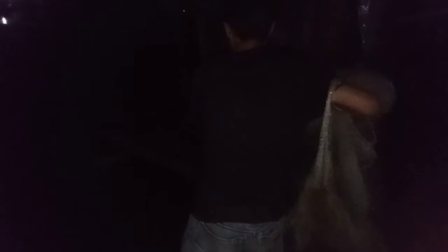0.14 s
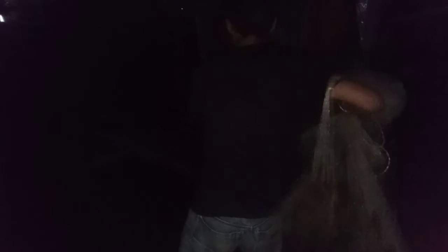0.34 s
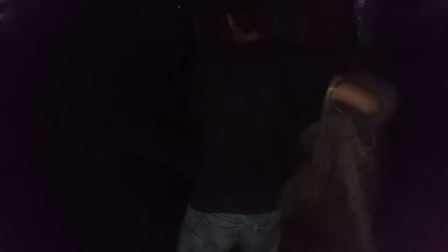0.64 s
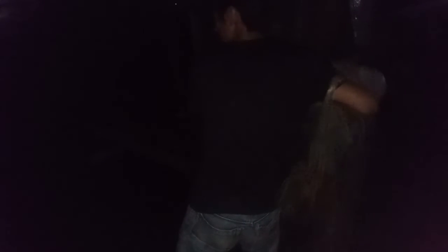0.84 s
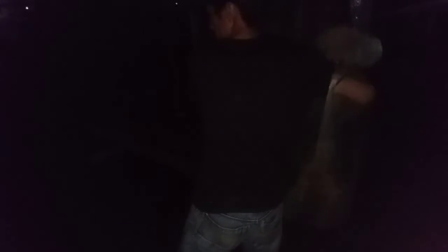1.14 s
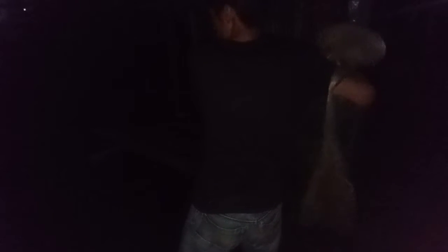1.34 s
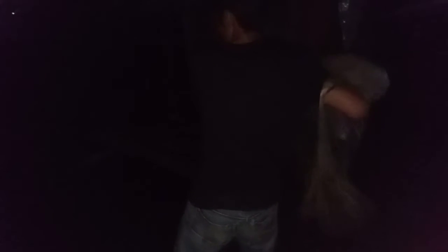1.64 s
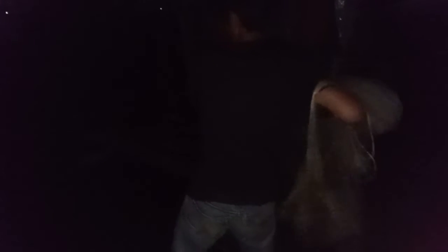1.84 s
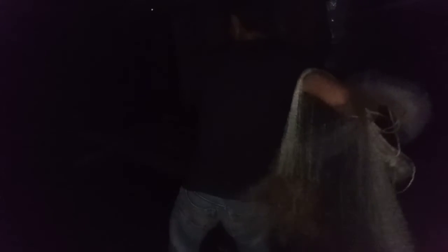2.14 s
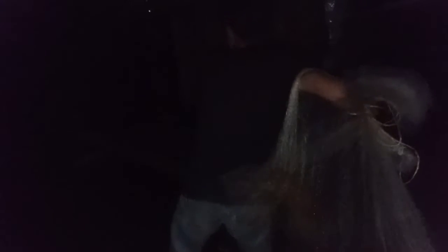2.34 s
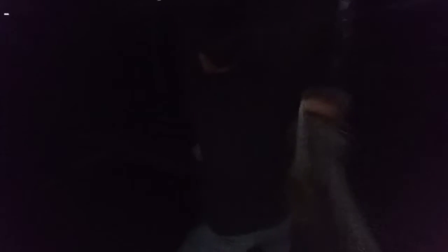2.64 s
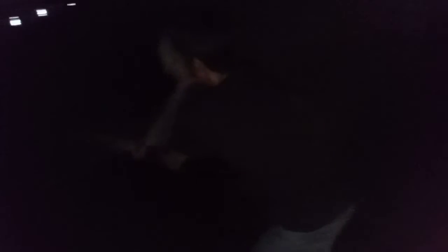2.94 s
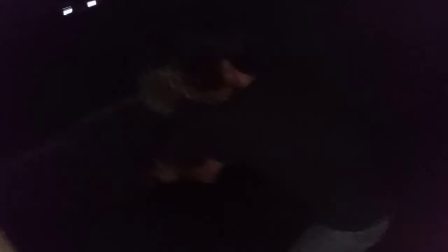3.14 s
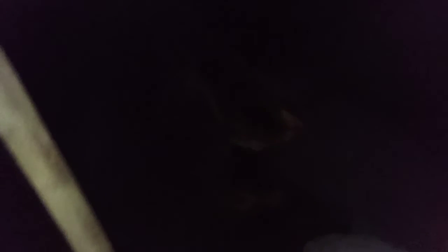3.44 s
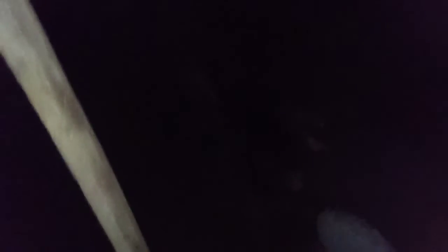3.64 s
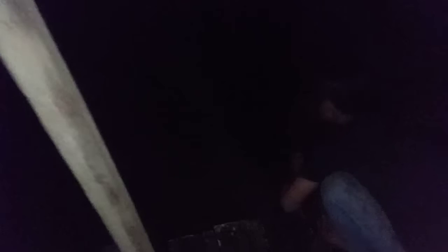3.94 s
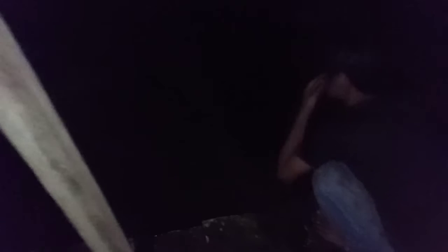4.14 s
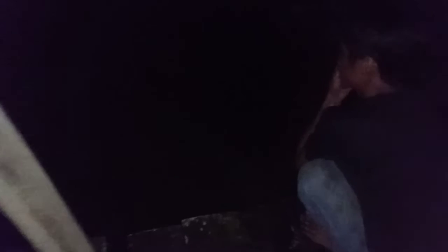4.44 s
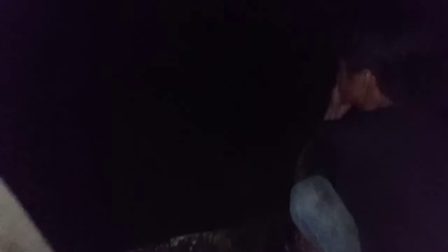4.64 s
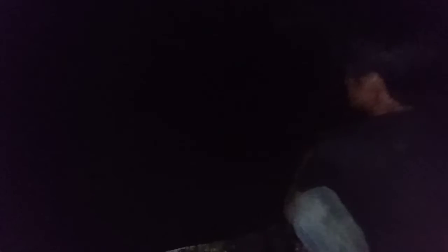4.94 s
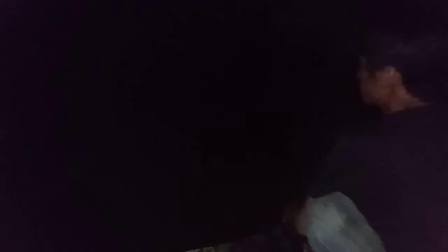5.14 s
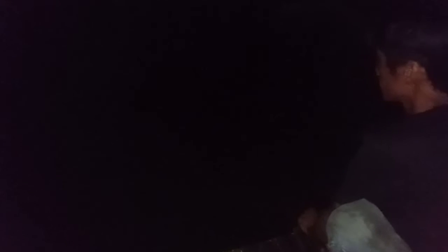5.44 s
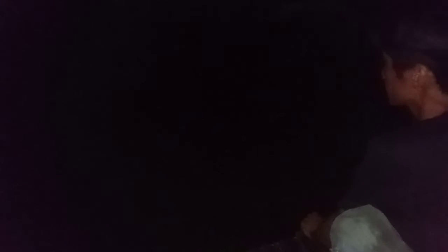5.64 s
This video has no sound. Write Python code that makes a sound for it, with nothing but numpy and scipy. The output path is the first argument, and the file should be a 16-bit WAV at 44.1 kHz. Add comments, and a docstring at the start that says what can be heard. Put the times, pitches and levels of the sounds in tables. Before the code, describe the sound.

A wet net rustles and jingles, then is thrown and splashes into a river, over a chirping cricket and low hum.

```python
"""A cast net slaps into a river at night: its weighted rim hits the water, the mesh drags air under
to ring as bubbles, and spray patters back down. Before that, the fisher gathers the net and throws it:
the mesh rustles, the chain weights jingle, and there is a sharp snap and a heavy step.
Nearby a cricket chirps by scraping its wings. Far off, an engine's exhaust drones and a thin call
wavers, over the low rumble and faint insect hiss of the night air."""
import sys
import numpy as np
from scipy import signal
from scipy.fft import rfft, irfft, next_fast_len
from scipy.io import wavfile
from scipy.ndimage import uniform_filter1d

SR = 44100
rng = np.random.default_rng(int(sys.argv[2]) if len(sys.argv) > 2 else 0)


def wav_out(sig):
    """Save sig, one row per channel (or a flat mono array), as 16-bit PCM at SR to the path in sys.argv[1]."""
    wavfile.write(sys.argv[1], SR, np.round(np.clip(np.atleast_2d(sig).T, -1, 1) * 32767).astype(np.int16))


N = 254898
TIME = np.arange(N) / SR

# Levels in the tables are relative. A ring time is how long a tone takes to fall by 60 dB.
# A fade is how long a sound takes to fall to about a third of its strength.

# the rim and then the mesh hit the water: (time [s], level [dB], length [s], fade [s])
SLAPS = [(3.796, -30, 0.015, 0.036), (3.846, -23.5, 0.0083, 0.053), (4.035, -26.5, 0.0094, 0.0035)]
# surges of churned water, from the rim going in to the last froth:
# (time [s], length [s], fade [s], large bubbles [dB], small bubbles [dB], spray [dB])
SURGES = [(3.791, 0.035, .02, -60, -37.5, -40), (3.832, 0.18, 0.074, -34, -31.5, -31.5),
          (3.869, 0.24, 0.0078, -33.5, -30.5, -38.5), (4.033, 0.023, 0.0056, -56, -24, -24.5),
          (4.098, 0.058, 0.014, -50, -30.5, -35), (4.161, 0.1, 0.039, -41, -31, -35.5),
          (4.293, 0.13, 0.012, -38.5, -33.5, -38), (4.2, 0.32, 0.14, -45.5, -39.5, -47)]
# tone colours of the slap, large bubbles, small bubbles and spray: (frequency [Hz], level [dB])
SLAP_COLOUR = [(300, -22), (800, -25), (1300, -4), (2400, 4), (4400, -4), (6000, -4.5), (7300, 7.5),
               (8400, -1), (9800, -15), (15500, -7.5)]
LARGE_BUBBLE_COLOUR = [(200, -33), (350, -13), (480, -0.5), (650, 4), (850, 0), (1100, 4), (1600, -61),
                       (3000, -50)]
SMALL_BUBBLE_COLOUR = [(600, 11), (1100, -6.5), (1500, -0.5), (2200, 6), (3000, -2), (3800, -4.5),
                       (4600, -8.5), (6000, 2), (10000, -52)]
SPRAY_COLOUR = [(2500, 18.5), (4500, -12), (5600, -2.5), (7000, 3), (8200, 0), (9600, -8.5), (12500, -9),
                (15800, -8.5)]
# single plops: (time [s], level [dB], pitch [Hz], ring time [s], glide [octaves/s])
PLOPS = [(4.2964, -10.5, 1407, 0.011, 20), (4.301, -18, 2430, 0.017, 5.9), (4.208, -20.5, 2150, 0.019, 2.5),
         (4.4195, -13.5, 4740, 0.0033, 20), (4.726, -40, 2620, .02, 10), (4.736, -34.5, 900, 0.013, 5),
         (4.769, -38.5, 2370, 0.017, 8.8), (4.788, -36, 3270, 0.014, 8), (5.106, -46, 2940, 0.0094, 14),
         (5.232, -42, 5950, 0.0073, 20), (5.402, -47.5, 1920, 0.022, 8), (5.621, -49, 1440, 0.024, 5)]

# the net is gathered, swung and thrown: (time [s], half width [s], rustle [dB], jingle [dB])
NET_MOVES = [(.2, 0.12, -71, -76), (.45, 0.052, -68, -58), (.8, 0.052, -88, -61), (1.2, 0.021, -69, -75),
             (1.66, 0.072, -64.5, -63.5), (1.95, 0.15, -80, -75), (2.22, 0.15, -73, -66),
             (2.71, 0.11, -65.5, -54.5), (2.92, .12, -62, -58), (3.26, 0.18, -58, -57),
             (3.63, 0.22, -62, -57.5)]
# shakes of the chain: (time [s], level [dB], length [s], hardness [0 to 1])
CHAIN_SHAKES = [(0.038, -58, 0.01, 1), (0.104, -55.5, 0.069, 0.94), (.209, -52.5, 0.024, .5),
                (0.248, -51, 0.016, 0.9), (0.311, -40.5, 0.033, 0.74), (.646, -52, .0072, .02),
                (0.759, -52, 0.0086, 0.14), (1.117, -60, .006, .9), (1.195, -57, 0.017, 0.2),
                (1.264, -57, .006, 1), (1.841, -51, .007, 0.03), (1.884, -49, .01, 0.03),
                (1.923, -58, .0067, .8), (2.167, -44, 0.0049, 1), (2.403, -55, 0.015, 0.3),
                (2.444, -47, 0.0083, 0.73), (2.631, -47.5, .008, 0), (2.915, -48, .0089, 1),
                (3.095, -48, .011, 1)]
# tones of a chain link, and of weights knocking together: (pitch [Hz], level [dB], ring time [s])
LINK_TONES = [(3780, -13.5, 0.034), (8260, 1.5, 0.06), (12168, 2.5, 0.037), (12600, -5, 0.043)]
WEIGHT_TONES = [(2150, -0.5, .05), (2370, -6, .04), (3420, -7, 0.033), (3820, -1, .05)]
# tone colours of rustling mesh and of link ticking on link: (frequency [Hz], level [dB])
MESH_COLOUR = [(500, -1.5), (1100, -9.5), (1800, -1.5), (2150, 0.5), (2900, -2), (3900, 1.5), (4500, -20),
               (6000, -0.5), (7900, 6.5), (9500, -7), (14000, 1), (16000, -23)]
TICK_COLOUR = [(1000, -22), (2500, -14), (3600, -7), (4600, -23), (6200, -0.5), (8000, 2), (9800, -6.5),
               (13000, -1), (16000, -22)]
# tones of the snap, and of the ground underfoot: (pitch [Hz], level [dB], ring time [s])
SNAP_TONES = [(2150, -10.5, 0.0077), (2850, 10.5, 0.0017), (3500, -23, 0.015)]
GROUND_TONES = [(225, 3.5, 0.083), (260, 0, 0.044), (99, -6, 0.24)]
# tone colours of the snap and of the scuffing sole: (frequency [Hz], level [dB])
SNAP_COLOUR = [(600, -10), (1300, -8), (2000, -3.5), (3900, -1.5), (4600, -13), (9000, -18)]
SCUFF_COLOUR = [(200, 3), (650, -0.5), (1100, -5.5), (2800, -5.5), (4500, -26), (9000, -38)]

# runs of even chirping:
# (time [s], chirps [count], chirp spacing [s], wing strokes per chirp [count], level [dB])
CHIRP_RUNS = [(.028, 3, .171, 3, -56), (.557, 5, .062, 1, -56), (.870, 4, .163, 3, -57),
              (1.520, 4, .168, 3, -56.3), (2.173, 4, .0645, 1, -53.3), (2.417, 4, .1218, 2, -55),
              (2.920, 2, .156, 3, -58.3), (3.211, 3, .172, 3, -54.5), (3.742, 1, .172, 3, -56),
              (4.594, 4, .167, 3, -57.5), (5.260, 3, .171, 3, -60), (5.728, 1, .171, 1, -60)]
# the engine's main boom: (time [s], level [dB])
ENGINE_BOOM = [(0.0, -46), (0.31, -52), (0.35, -64), (0.69, -49), (1.8, -45.5), (2.12, -54.5),
               (2.35, -46.5), (2.61, -50.5), (3.93, -45.5), (5.78, -45.5)]
# its overtones: (pitch [multiple of the firing rate], level [dB])
ENGINE_OVERTONES = [(5, 0.5), (6, -6), (8, -11), (9, -0.5), (10, -3.5), (11, -15.5), (12, -20), (13, -12.5),
                    (14, -13.5), (15, -17), (16, -22), (17, -29)]
# the overtones swell on the night air: (time [s], half width [s], rise [dB])
ENGINE_SWELLS = [(.2, 0.33, 3), (1.13, 0.59, 13), (1.68, .18, 4.5), (3.9, 0.78, 5.5)]
# a steady hum under the engine: (pitch [Hz], level [dB])
ENGINE_HUM = [(69.6, -60.5), (87, -91), (104.4, -59.5)]
# the path of the far call: (time [s], pitch [Hz], level [dB])
FAR_CALL = [(5.45, 1700, -76), (5.58, 1770, -67), (5.69, 1760, -70), (5.78, 1710, -82)]
# tone colour of the night air: (frequency [Hz], level [dB])
AIR_COLOUR = [(20, -23), (45, -20.5), (70, -11.5), (133, -2.5), (200, -5.5), (291, -10.5), (380, -15.5),
              (900, -26), (3100, -27.5), (4600, -35.5), (5500, -33.5), (6100, -26), (7400, -39),
              (8600, -31), (9700, -46.5), (15800, -45)]


def splash():
    """Hundreds of weights hit at once; trapped air rings as bubbles and spray falls back in clumps."""
    strike = sum(amp(db) * burst(s, 0.0019, length, fade) for s, db, length, fade in SLAPS)
    slaps = strike * colour(clicks(16000, 1.23), SLAP_COLOUR)
    large = bubbles(390, 1400, per_s=1300, cycles=16, spread_db=1.8, count=24)
    froth = bubbles(1000, 5000, per_s=3200, cycles=19, spread_db=2.4)
    gurgles = bubbles(1000, 4200, per_s=260, cycles=26, spread_db=2.4, count=20)
    settled = np.interp(TIME, [4.0, 4.25, 4.8], [0, .25, .55])
    small = np.sqrt(1 - settled) * froth + np.sqrt(settled) * gurgles  # the froth thins out
    spray = bubbles(3500, 16000, per_s=12000, cycles=18, spread_db=2.6)
    *_, large_db, small_db, spray_db = np.transpose(SURGES)
    # large bubbles take longest to form
    churn = churning(large_db, rise_s=0.038) * colour(large, LARGE_BUBBLE_COLOUR)
    churn += churning(small_db, rise_s=0.025) * colour(small, SMALL_BUBBLE_COLOUR)
    foam = linger(3.86, db=-45, db_per_s=11.6)
    spray_strength = np.hypot(churning(spray_db, rise_s=0.0058), foam) * amp(1.9 * drift(90))
    churn += spray_strength * colour(spray, SPRAY_COLOUR)
    return bank_echo(slaps + amp(-1.3) * churn, ring_s=.25, echo_db=-12)


def churning(levels_db, rise_s):
    """How strong one kind of bubble is over time: the surges add up in power."""
    surges = (amp(db) * burst(s, rise_s, length, fade)
              for (s, length, fade, *_), db in zip(SURGES, levels_db))
    return np.sqrt(sum(surge ** 2 for surge in surges))


def bubbles(low_hz, high_hz, per_s, cycles, spread_db, rise_octaves=0.29, count=30):
    """A cloud of bubbles in `count` sizes; each rings for `cycles` vibrations as its pitch rises."""
    out = np.zeros(N)
    births, size = clicks(per_s, spread_db), rng.integers(0, count, N)
    for k, hz in enumerate(np.geomspace(low_hz, min(high_hz, SR / 3), count)):
        ring_s = cycles / hz
        tone = ring(hz * rng.uniform(0.96, 1.03), ring_s, rise_octaves / ring_s, onset_s=3 / hz)
        out += np.sqrt(hz) * signal.oaconvolve(births * (size == k), tone)[:N]  # one tone per click
    return unit(out)


def plops():
    """Single larger pockets of air ring in the water, each gliding upward."""
    out = np.zeros(N)
    for s, db, hz, ring_s, glide in PLOPS:
        add(out, s, amp(db) * ring(hz, ring_s, glide, onset_s=0.57 / hz))
    return bank_echo(out, ring_s=0.19, echo_db=-3.5)


def drips():
    """Droplets each trap a tiny bubble: a few from the wet net, then the late spray."""
    net_held = np.interp(TIME, [.9, 1.1, 2.6, 3.0], [0, 1, 1, 0])
    from_net = bubbles(11000, 14500, per_s=16, cycles=220, spread_db=1.5, rise_octaves=.08, count=12)
    from_spray = bubbles(5500, 14700, per_s=600, cycles=34, spread_db=2.3, rise_octaves=.2, count=20)
    return amp(-77.5) * net_held * from_net + linger(4.5, db=-61, db_per_s=7.9) * from_spray


def net():
    """Mesh rubs on mesh; the chain on its rim clinks in the hand and jingles softly in flight."""
    rubbing = sum(amp(db) * swell(s, width) for s, width, db, _ in NET_MOVES)
    jingling = sum(amp(db) * swell(s, width) for s, width, _, db in NET_MOVES)
    above_water = np.interp(TIME, [SLAPS[0][0], SLAPS[1][0]], [1, 0])
    flying = np.interp(TIME, [2.55, 3.15], [0, 1])
    hard_blows = amp(-3) * jingling * (1 - flying) * unit(clicks(110, 2))
    soft_blows = np.zeros(N)
    for s, db, length, hardness in CHAIN_SHAKES:
        add(hard_blows, s, amp(db) * np.sqrt(hardness) * shake(length))
        add(soft_blows, s, amp(db) * np.sqrt(1 - hardness) * shake(length))
    # hard blows tick, and ring brighter than soft ones
    ticks = amp(-5) * np.std(hard_blows) * colour(hard_blows, TICK_COLOUR)
    clinks = chain(hard_blows, treble_db_per_octave=12.5, detune=0.0173)
    clinks += chain(soft_blows, treble_db_per_octave=-30, detune=0.0078)
    tumbling = jingling * flying * above_water * amp(3 * drift(45))
    jostles = amp(4.5) * tumbling * unit(clicks(550, 3.3))
    rattle = chain(jostles, treble_db_per_octave=-10, detune=0.024)
    rattle += amp(-9) * tumbling * knocks()
    rustle_strength = amp(5 + 3 * drift(60)) * rubbing * above_water
    rustle = rustle_strength * colour(clicks(3000, 2.5), MESH_COLOUR)
    return clinks + ticks + rattle + rustle


def shake(length_s, blows_per_s=900, spread_db=4, settle_db=-7, settle_s=0.033):
    """The blows in one shake of the chain: a firm one, a flurry of others, then the links settle."""
    t = np.arange(SR // 4) / SR
    blows = amp(spread_db * rng.standard_normal(len(t))) * rng.choice([-1, 1], len(t))
    blows *= rng.random(len(t)) < blows_per_s / SR
    settling = amp(settle_db) * np.exp(-np.maximum(t - length_s, 0) / settle_s)
    blows *= np.where(t < length_s, 1, settling)
    blows[0] = amp(7)  # the firm first blow
    return blows * np.sqrt(length_s * SR) / np.linalg.norm(blows)


def chain(blows, treble_db_per_octave, detune, count=26):
    """Each blow lands on one of the links, which all ring at slightly different pitches."""
    out, link = np.zeros(N), rng.integers(0, count, N)
    for k in range(count):
        tone = np.zeros(SR // 8)
        for hz, db, ring_s in LINK_TONES:
            treble_db = treble_db_per_octave * max(np.log2(hz / LINK_TONES[1][0]), 0)
            uneven_db = 3.5 * rng.standard_normal()
            link_hz = hz * (1 + detune * rng.standard_normal())
            add(tone, 0, amp(db + treble_db + uneven_db) * ring(link_hz, ring_s))
        out += signal.oaconvolve(blows * (link == k), tone / np.linalg.norm(tone))[:N]
    return out


def knocks():
    """The weights bump one another at random and ring dully."""
    return unit(sum(amp(db) * unit(signal.oaconvolve(clicks(250, 2), ring(hz, ring_s))[:N])
                    for hz, db, ring_s in WEIGHT_TONES))


def snap(time_s=3.1067, peak_db=-14.5):
    """A short dry crack as the net leaves the hand."""
    out = np.zeros(N)
    for hz, db, ring_s in SNAP_TONES:
        add(out, time_s, amp(db) * ring(hz, ring_s, onset_s=0.0006))
    out = colour(out, SNAP_COLOUR)
    return amp(peak_db) * out / abs(out).max()


def step(time_s=3.513, thud_db=-24.5, scuff_db=-53.5):
    """At the end of the throw a foot scuffs and lands, and the ground gives a dull thud."""
    out = amp(scuff_db) * swell(time_s + 0.028, 0.13) * colour(rng.standard_normal(N), SCUFF_COLOUR)
    for hz, db, ring_s in GROUND_TONES:
        add(out, time_s, amp(thud_db + db) * ring(hz, ring_s, onset_s=1.2 / hz))
    return out


def cricket(top_hz=5455, fall_hz=540, vary_hz=18, stroke_s=0.0325, lone_stroke_s=0.04, spacing_s=.036):
    """Each wing stroke is a tone that sags as the scraper slows; a ground echo beats against it."""
    out = np.zeros(N)
    for start, chirps, period, strokes, db in CHIRP_RUNS:
        progress = np.linspace(0, 1, int(SR * (lone_stroke_s if strokes == 1 else stroke_s)))
        shape = np.sqrt(2) * abs(np.sin(np.pi * progress ** 0.8))
        for chirp, stroke in np.ndindex(round(chirps), round(strokes)):
            s = start + chirp * period + stroke * spacing_s
            jitter = unit(uniform_filter1d(rng.standard_normal(SR // 8), 60))[:len(progress)]
            hz = top_hz - fall_hz * progress ** 1.59 + vary_hz * (rng.standard_normal() + jitter)
            tone = amp(db + 0.44 * rng.standard_normal()) * shape * np.sin(phase(hz))
            add(out, s, tone)
            add(out, s + .0058 + 0.00032 * rng.random(), 0.58 * tone)  # the ground echo
    turned = np.interp(TIME, [3.8, 4.5], [0, 1])  # facing away, more of it arrives as echo
    facing = bank_echo(out, ring_s=.2, echo_db=-8)
    facing_away = amp(0.5) * bank_echo(out, ring_s=0.18, echo_db=-3)
    return (1 - turned) * facing + turned * facing_away


def engine(firing_hz=30.3, creep_hz_per_s=.07, wander_hz=.12):
    """A far exhaust booms at four times its firing rate; overtones come and go on the night air."""
    firing = phase(firing_hz + creep_hz_per_s * TIME + wander_hz * drift(6))
    boom_db, = curves(ENGINE_BOOM)
    out = amp(boom_db - 1.2 - 0.6 * drift(15)) * np.sin(4 * firing)
    overtones_db = -63 + sum(db * swell(s, width) for s, width, db in ENGINE_SWELLS)
    for multiple, db in ENGINE_OVERTONES:
        strength = amp(overtones_db + db + 1.65 * drift(5.4))
        out += strength * np.sin(multiple * firing + 0.63 * drift(10) + 2 * np.pi * rng.random())
    for hz, db in ENGINE_HUM:
        out += amp(db + 0.36 * drift(9.9)) * np.sin(2 * np.pi * (hz * TIME + rng.random()))
    return np.sqrt(2) * out


def far_call(waver_hz=60):
    """A faint unsteady whistle, blurred by distance."""
    hz, db = curves(FAR_CALL)
    started = TIME > FAR_CALL[0][0]
    tone = np.sqrt(2) * amp(db) * started * np.sin(phase(hz + waver_hz * drift(120)))
    return bank_echo(tone, ring_s=0.42, echo_db=1.5)


def night_air(level_db=-51.2):
    """Low rumble and the faint hiss of far insects."""
    return amp(level_db + .5 * drift(7.7)) * colour(rng.standard_normal(N), AIR_COLOUR)


def bank_echo(x, ring_s, echo_db):
    """Adds scattered echoes from the river bank and the water."""
    t = np.arange(SR // 2) / SR
    echoes = rng.standard_normal(len(t)) * (rng.random(len(t)) < .05)
    echoes *= (t > .003) * np.exp(-np.log(1000) * t / ring_s)
    return x + amp(echo_db) * signal.oaconvolve(x, echoes / np.linalg.norm(echoes))[:N]


def ring(hz, ring_s, glide=0., onset_s=0.00018):
    """A dying tone whose pitch may glide, in octaves per second."""
    t = np.arange(int(max(ring_s, .002) * SR)) / SR
    tone = np.sin(phase(hz * 2 ** (glide * t)))
    return tone * np.exp(-np.log(1000) * t / ring_s) * (1 - np.exp(-t / onset_s))


def clicks(per_s, spread_db):
    """Clicks of uneven size at random times."""
    size = amp(spread_db * np.minimum(rng.exponential(1, N), 4)) * rng.choice([-1, 1], N)
    return size * (rng.random(N) < per_s / SR)


def colour(x, points):
    """Gives a sound a tone colour, then scales it to strength 1."""
    hz, db = np.transpose(points)
    size = next_fast_len(len(x))
    frequencies = np.fft.rfftfreq(size, 1 / SR)
    gain = amp(np.interp(np.log(frequencies + 1), np.log(hz), db))
    return unit(irfft(rfft(x, size) * gain, size)[:len(x)])


def burst(s, rise, length, fade):
    """A loudness shape: rises from time s, holds until length is over, then fades."""
    return np.clip((TIME - s) / rise, 0, 1) * np.exp(-np.maximum(TIME - s - length, 0) / fade)


def swell(s, half_width):
    """A loudness shape: a smooth hill around time s."""
    return np.exp(-((TIME - s) / half_width) ** 2)


def linger(s, db, db_per_s):
    """A loudness shape: a long even fade from time s."""
    return (TIME > s) * amp(db - db_per_s * np.maximum(TIME - s, 0))


def drift(per_s):
    """Wanders to a new random value per_s times a second."""
    values = rng.standard_normal(4096)
    return unit(np.interp(TIME * per_s, np.arange(len(values)), values))


def curves(rows):
    """Joins the points in each column of a table into a line over time."""
    s, *columns = np.transpose(rows)
    return [np.interp(TIME, s, column) for column in columns]


def phase(hz):
    """The running angle of a wave whose pitch changes."""
    return 2 * np.pi * np.cumsum(hz) / SR


def add(mix, s, sound):
    """Mixes a sound in at time s."""
    part = mix[max(round(s * SR), 0):][:len(sound)]
    part += sound[:len(part)]


def amp(db):
    """Turns decibels into a multiplier."""
    return 10 ** (np.asarray(db) / 20)


def unit(x):
    """Scales a signal to an average strength (rms) of 1."""
    return x / np.sqrt(np.mean(x ** 2) + 1e-20)


def scene():
    """The throw and the night around it, in one channel."""
    night = night_air() + engine() + cricket() + far_call()
    return (night + net() + snap() + step() + splash() + plops() + drips())[None]


def record(dry, low_hz=44, high_hz=15720):
    """Cuts the deep bass; the highest treble is cut too."""
    thin = signal.sosfilt(signal.butter(3, low_hz, "high", fs=SR, output="sos"), dry)
    treble_cut = signal.firwin(511, high_hz, window=("kaiser", 9), fs=SR)
    return signal.oaconvolve(thin, treble_cut[None], "same")


dry = scene()
out = record(dry)
wav_out(out)
```